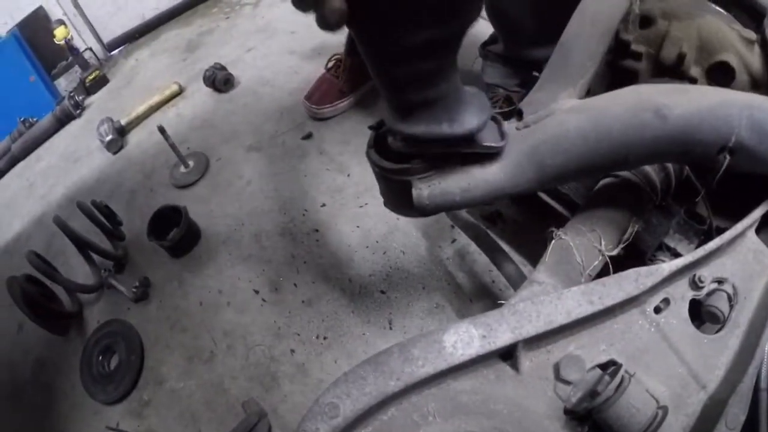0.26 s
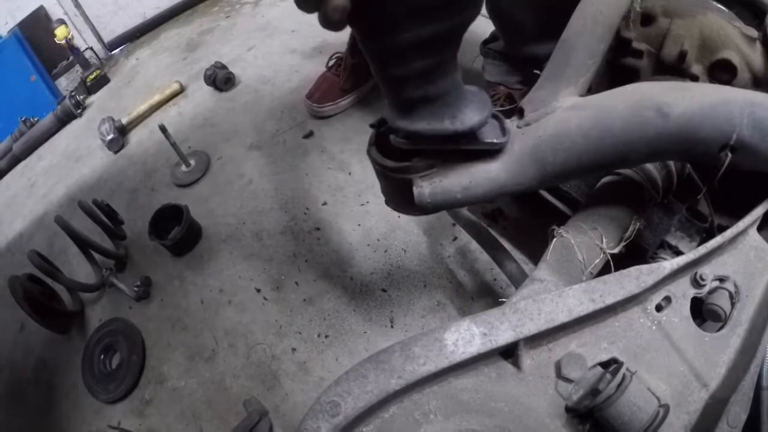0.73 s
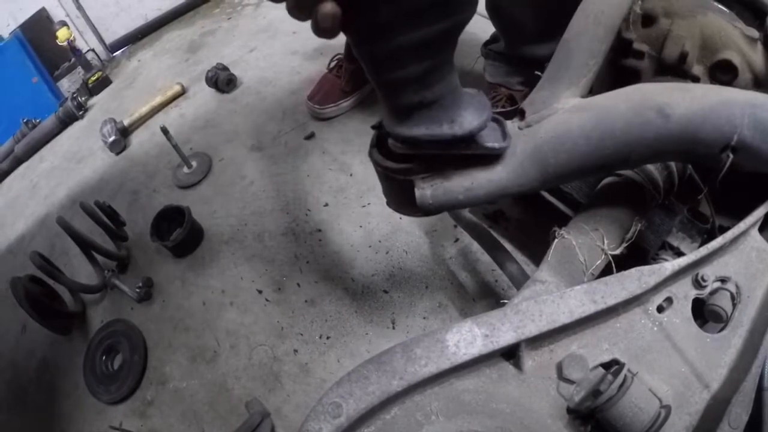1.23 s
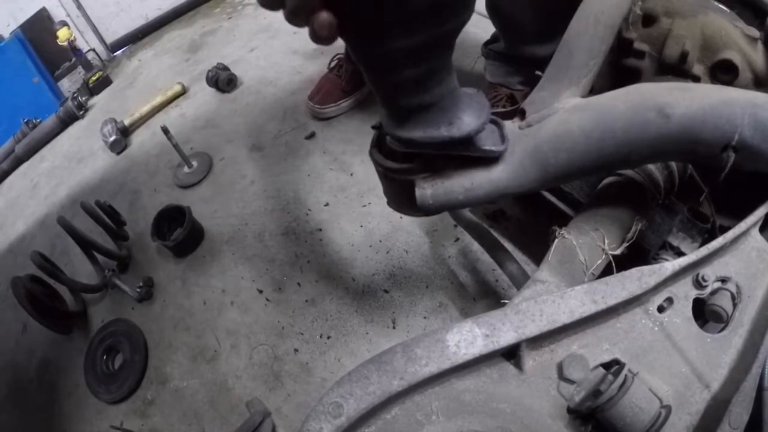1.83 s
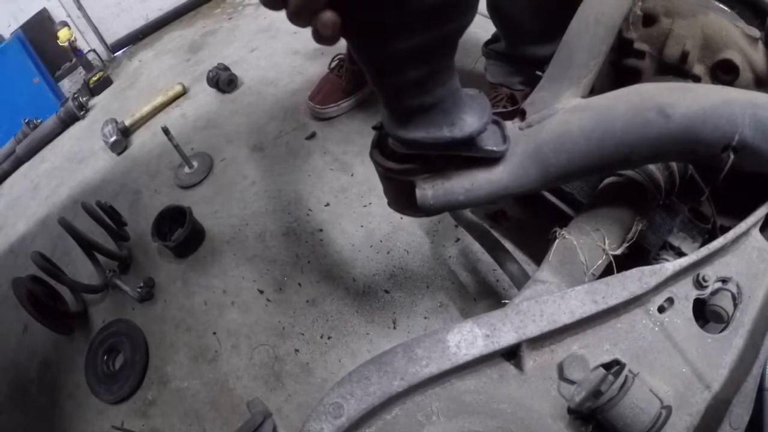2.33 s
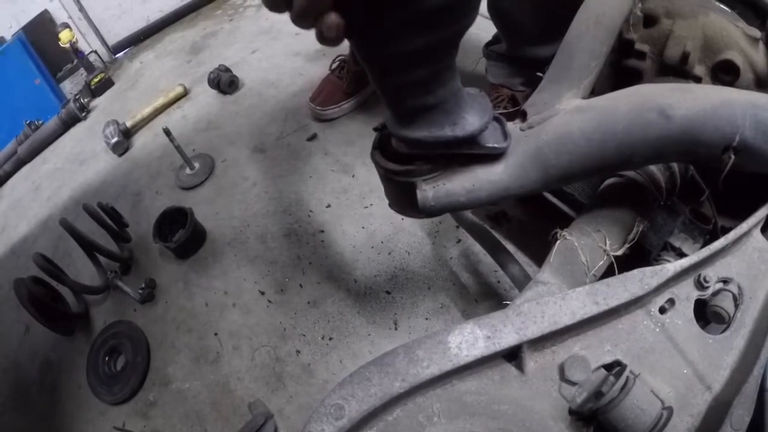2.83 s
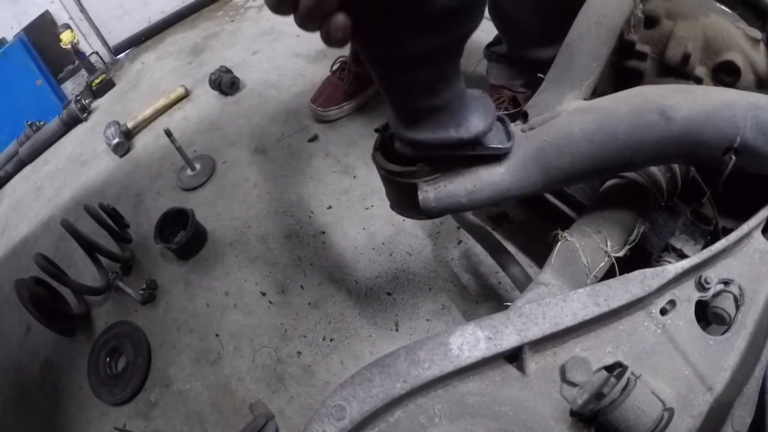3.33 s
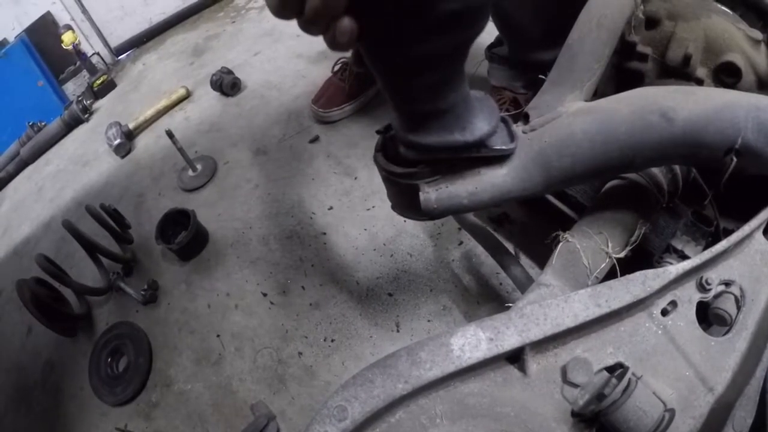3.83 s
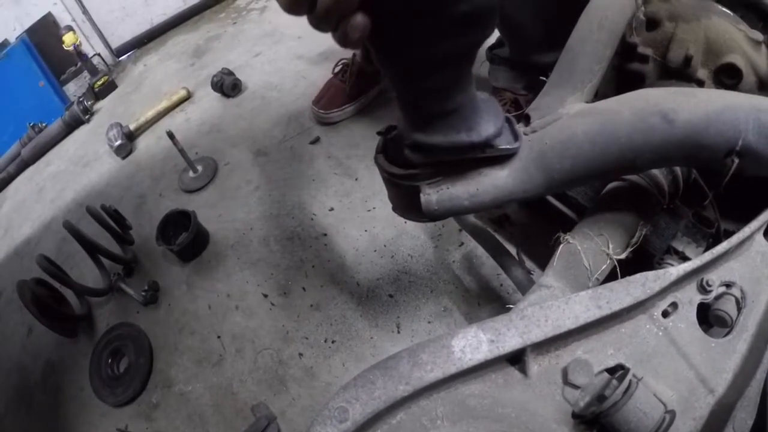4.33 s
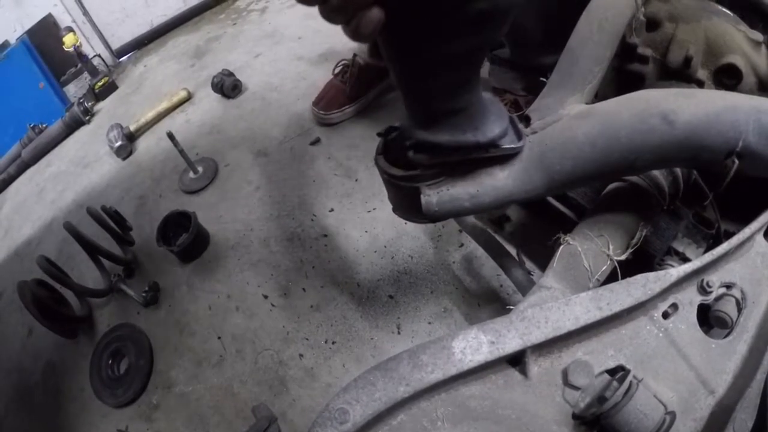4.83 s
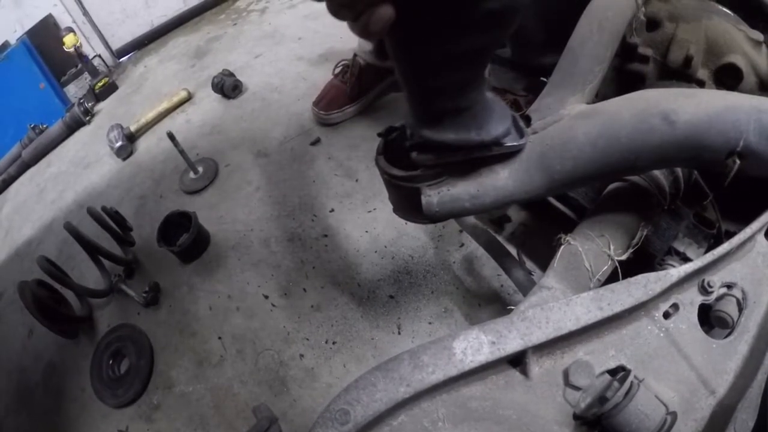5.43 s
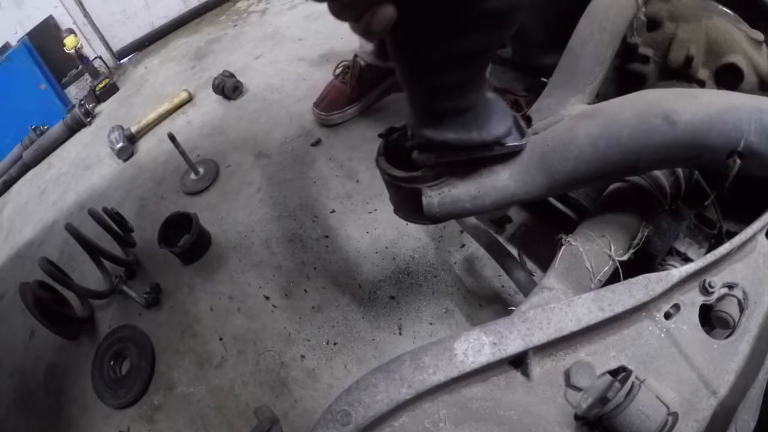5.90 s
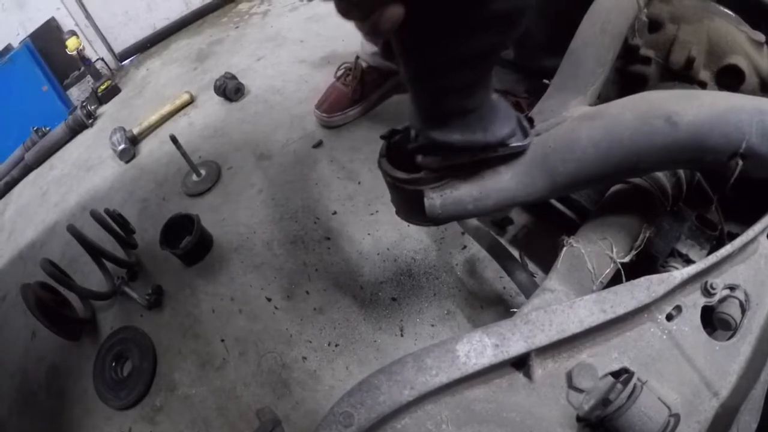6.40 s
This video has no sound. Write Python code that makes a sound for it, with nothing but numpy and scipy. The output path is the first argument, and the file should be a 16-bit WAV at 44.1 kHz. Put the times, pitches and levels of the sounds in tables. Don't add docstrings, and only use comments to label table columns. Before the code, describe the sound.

A reciprocating saw stutters into a steel sleeve, speeds up to a harsh, rattling cut, squeals late and chatters in a concrete garage.

```python
import sys
import numpy as np
from scipy import signal
from scipy.io import wavfile

SR = 44100
rng = np.random.default_rng(int(sys.argv[2]) if len(sys.argv) > 2 else 0)


def to_linear_factor(level_db):
    exponent = np.asarray(level_db, float) / 20
    return 10 ** exponent


def master(y):
    cut = np.clip(np.atleast_2d(y).T, -1, 1)
    pcm = np.round(cut * 32767)
    wavfile.write(sys.argv[1], SR, pcm.astype(np.int16))


N = 293706
TIME = np.arange(N) / SR

# (time [s], speed [turns/s])
CRANK_SPEED = [(0.0, 14.98), (0.12, 25.05), (0.27, 10.67), (0.58, 13.59), (0.94, 12.7), (1.21, 26.53),
               (1.85, 24.61), (2.58, 24.55), (2.75, 38.3), (3.53, 38.86), (3.86, 42.82), (4.03, 37.43),
               (4.36, 40.72), (4.6, 33.96), (5.49, 38.07), (6.3, 34.7), (6.38, 31.03), (6.66, 32.79)]
# (time [s], speed gained [turns/s])
SLIPS = [
    (1.1, 0.76),
    (1.42, 1.38),
    (1.9, 1.82),
    (2.64, 5.15),
    (3.22, -2.25),
    (3.38, 3.22),
    (4.72, 2.82),
    (5.13, 2.25),
    (5.89, -0.73),
    (6.26, 1.98),
]
# (time [s], position [share of a turn])
BITE_POSITION = [(0, .44), (1.0, .46), (2.0, .42), (3.0, .44), (3.2, .36), (3.9, .33), (4.1, .43),
                 (5.0, .435), (6.0, .445), (6.4, .39), (6.66, .42)]
# (time [s], steady rasp [dB], bite [dB], return knock [dB], shoe on the frame [dB])
HAND_FEED = [(0, -29.5, -26.5, -13.5, 6), (.15, -25, -16, -22, 4.5), (.3, -32.5, -30, -28, 5),
             (.43, -44, -55, -37, 4), (.6, -33.5, -28, -28, 3), (.72, -30, -26.5, -22.5, 5),
             (1.0, -30, -16.5, -15.5, 0.5), (1.2, -23, -14, -20, 4), (1.6, -24.5, -13.5, -17.5, 2),
             (2.2, -23, -12.5, -8.5, 0.5), (2.6, -24, -13.5, -20, 1.5), (2.68, -19, -11.5, -12, -2),
             (3.5, -19.5, -12, -15, 1), (4.35, -20, -13, -9, 0), (4.6, -20.5, -9, -20, 2.5),
             (5.4, -22.5, -10, -28, 2.5), (6.25, -20.5, -12.5, -8, -2.5), (6.66, -24.5, -10.5, -13, 0.5)]
# (time [s], peak [dB], brightness [dB])
SNAGS = [(0.103, -13.5, -50), (0.144, -23, -45), (0.2771, -13, -15), (0.392, -16.5, -15),
         (0.5874, -20, -24), (0.681, -18.5, -18), (0.775, -27, -24), (0.813, -25, -25), (0.851, -31, -28),
         (0.9645, -18, -30), (2.378, -10, -36), (6.3932, -5, -14), (6.4594, -4.5, -7)]
# (time [s], tone pitch [Hz], tone [dB], screech [dB])
SQUEAL = [
    (5.45, 2440, -22, -70),
    (5.52, 2365, -29, -55),
    (5.62, 2320, -20, -32),
    (5.67, 2120, -25.5, -30.5),
    (5.85, 2023, -19, -30),
    (5.92, 2002, -20, -29),
    (6.0, 2014, -24.5, -31),
    (6.13, 2000, -19, -29),
    (6.18, 2070, -41, -63),
]
# (time [s], pitch [Hz], level [dB])
PLATE_RING = [
    (.26, 3930, -62),
    (.32, 3940, -58),
    (.55, 3980, -45),
    (.62, 3940, -70),
]
# (mesh pitch [Hz], mesh [dB], half mesh [dB])
GEAR_CASE = [(1100, -53, -71), (1360, -41, -62), (1860, -36, -48), (2406, -35.5, -43), (2526, -26, -39),
             (2970, -30, -52), (3510, -37.5, -31.5), (4060, -41.5, -28.5)]
# (speed [turns/s], order 1 [dB], order 2 [dB], order 4 [dB], rumble [dB])
FLOOR_SHAKE = [(11, -53, -46, -57, -56), (13.4, -64, -48, -57, -56), (24.9, -40.5, -49, -60, -42.5),
               (26.8, -39, -55, -62, -45.5), (33, -43.5, -41, -55, -40), (32.9, -38, -50.5, -55.5, -45),
               (36.8, -48, -45.5, -41.5, -41.5), (39, -42.5, -44, -124, -39.5)]
# (pitch [Hz], width [Hz], level [dB])
FRAME_MODES = [(1183, 176, -8), (1441, 220, -1), (1480, 1000, -29.5), (1884, 59, -1.5), (1977, 84, -1.5),
               (2180, 20, -19.5), (2486, 30, -1.5), (2624, 37, -5), (2897, 43, -0.5), (3050, 43, -3),
               (3255, 170, 1.5), (3581, 57, -0.5), (3823, 40, -1.5), (4445, 81, -10.5), (4940, 57, -13.5),
               (5353, 83, -11)]
# (pitch [Hz], width [Hz], level [dB])
SLEEVE_MODES = [(1850, 260, -4.5), (2612, 344, 2.5), (3132, 180, 3), (5390, 160, -11.5)]
# (pitch [Hz], width [Hz], level [dB])
CHIP_MODES = [(5600, 5100, 16), (8040, 540, 4), (9500, 1500, -57), (10400, 170, -14), (10980, 130, 2),
              (12800, 2200, -19), (15160, 620, 9)]
# (pitch [Hz], width [Hz], level [dB])
BLADE_MODES = [(4310, 180, 2), (5640, 70, -5), (6000, 110, -3), (6280, 54, -4.5), (7870, 670, -3.5),
               (10100, 500, -13)]
# (pitch [Hz], width [Hz], level [dB])
CHATTER_MODES = [(2780, 180, -7), (3130, 230, -2), (4700, 480, -10)]
# (pitch [Hz], width [Hz], level [dB])
PANEL_MODES = [(171.6, 10.6, -1.5), (312.6, 25.5, 5.5), (398, 43, 8), (532, 67, 0.5)]


def rms_one(x):
    return x / np.sqrt(np.mean(x ** 2) + 1e-20)


def read(rows, at):
    first, *columns = np.transpose(rows)
    return [np.interp(at, first, c) for c in columns]


def in_time(rows):
    return read(rows, TIME)


def resonate(x, hz, width):
    r = np.exp(-np.pi * width / SR)
    feedback = [1, -2 * r * np.cos(2 * np.pi * hz / SR), r * r]
    return signal.lfilter([(1 - r * r) / 2, 0, (r * r - 1) / 2], feedback, x)


def drift(rate):
    r = np.exp(-32 * np.pi * rate / SR)
    noise = rng.standard_normal(N // 16 + 3002)
    slow = rms_one(signal.lfilter([1], [1, -2 * r, r * r], noise)[3000:])
    return np.interp(np.arange(N) / 16, np.arange(len(slow)), slow)


def grit(spread_db):
    size_db = spread_db * np.minimum(rng.exponential(1, N), 5)
    return rms_one(rng.standard_normal(N) * to_linear_factor(size_db))


def contact(turns, late_ms, spread_db, rise_ms, fall_ms):
    marks = np.flatnonzero(np.diff(np.floor(turns)) > 0)
    luck = rng.standard_normal((500, 2))[:len(marks)]
    at = marks + (luck[:, 0] * late_ms * SR / 1000).astype(int)
    clicks = np.zeros(N)
    clicks[np.clip(at, 0, N - 1)] = to_linear_factor(spread_db * luck[:, 1])
    ms = np.arange(2000) * 1000 / SR
    shape = (1 - np.exp(-ms / rise_ms)) * np.exp(-ms / fall_ms)
    return clicks, signal.fftconvolve(clicks, shape / shape.max())[:N]


def body(modes, force, blows, turns, spread_db, patchy_db, grain_db=3.5):
    out = np.zeros(N)
    turn = (turns + .7).astype(int)
    teeth = grit(grain_db)
    for k, (hz, width, level_db) in enumerate(modes):
        width = max(width, hz / 45)
        share = to_linear_factor(spread_db * rng.standard_normal(400))[turn] * to_linear_factor(patchy_db * drift(2.63))
        drive = share * (force * np.roll(teeth, 4001 * k) + blows)
        even = np.sqrt(SR / np.pi / width)
        out += (-1) ** k * to_linear_factor(level_db) * even * resonate(drive, hz, width)
    return out / np.sqrt(np.sum(to_linear_factor(np.array(modes)[:, 2]) ** 2))


def crank():
    slip_s, first_turn = .07, .5
    slips = sum(gain * np.exp(-.5 * ((TIME - s) / slip_s) ** 2) for s, gain in SLIPS)
    speed = in_time(CRANK_SPEED)[0] + slips
    return speed, first_turn + np.cumsum(speed) / SR


def garage(x, t60):
    s = np.arange(int(.5 * SR)) / SR
    tail = rng.standard_normal(len(s)) * to_linear_factor(-60 * s / t60) * (s > .004)
    return signal.fftconvolve(x, tail / np.sqrt(np.sum(tail ** 2)))[:N]


def buzz(turns):
    out = np.zeros(N)
    for k, lead in enumerate(rng.random(18), start=3):
        level_db = -0.5 * np.log2(k / 8) + 4.2 * drift(3.4)
        out += to_linear_factor(level_db) * np.cos(2 * np.pi * (k * turns + lead))
    return out


def shake(turns, speed):
    *orders_db, rumble_db = read(FLOOR_SHAKE, speed)
    low = np.zeros(N)
    for db, k, lead in zip(orders_db, (1, 2, 4), (.5, .1, 2)):
        low += to_linear_factor(db + 3 + 3.0 / k * drift(4)) * np.cos(2 * np.pi * k * turns + lead)
    hits, jolt = contact(turns - .45, late_ms=.15, spread_db=1.0, rise_ms=1.2, fall_ms=4.0)
    panels = body(PANEL_MODES, to_linear_factor(rumble_db - 9) * (.7 + jolt), to_linear_factor(rumble_db + 27) * hits, turns,
                  spread_db=.8, patchy_db=2.2, grain_db=.5)
    floor = to_linear_factor(-55.0) * rms_one(resonate(rng.standard_normal(N), 29, 45))
    return low + to_linear_factor(-1) * panels + to_linear_factor(rumble_db - 17) * buzz(turns) + floor


def gears(turns, speed):
    mesh_per_turn, follows_bite = 97.8, 0.49
    case_hz, case_width_hz, rattle_width_hz = 2473, 103, 32
    rasp_db, bite_db, _, _ = in_time(HAND_FEED)
    hz = mesh_per_turn * speed
    mesh_db, half_db = read(GEAR_CASE, hz) + follows_bite * (bite_db + 14)
    angle = 2 * np.pi * turns
    bend = 1 + 0.011 * np.sin(angle + 0.69) + 0.0038 * drift(44.3)
    phase = 2 * np.pi * np.cumsum(hz * bend) / SR
    swell = to_linear_factor(2.5 * np.cos(angle - 3.3) + 5 * np.cos(2 * angle - .4) + 1.2 * drift(45))
    mesh = swell * to_linear_factor(mesh_db + 5.0) * np.sin(phase)
    half = to_linear_factor(half_db + 3.0 * np.cos(2 * angle - .6) + 2.0 * drift(40)) * np.sin(phase / 2)
    loose = rms_one(resonate(swell * grit(0.67), case_hz, rattle_width_hz))
    rattle = to_linear_factor(-36 + 0.33 * (rasp_db + 21.5)) * loose
    return mesh + resonate(mesh, case_hz, case_width_hz) + half + rattle


def thud(turns):
    _, bite_db, knock_db, shoe_db = in_time(HAND_FEED)
    pull_db = -26.5 + 0.76 * (bite_db + 12.5) + shoe_db
    back_db = -28 + 0.81 * (knock_db + 14) + shoe_db
    hits, pull = contact(turns - .43, late_ms=.25, spread_db=1.3, rise_ms=1.2, fall_ms=3.0)
    taps, back = contact(turns + .07, late_ms=.4, spread_db=1.8, rise_ms=1.2, fall_ms=3.0)
    force = to_linear_factor(pull_db) * (pull + 0.18) + to_linear_factor(back_db) * (back + 0.13)
    blows = to_linear_factor(24.0) * (to_linear_factor(pull_db) * hits + to_linear_factor(back_db) * taps)
    hollow = [(715, 110, -13), (930, 70, -4), (1000, 70, 0)]   # (pitch [Hz], width [Hz], level [dB])
    return body(hollow, to_linear_factor(-5) * force, blows, turns, spread_db=1.2, patchy_db=.6, grain_db=.6)


def chatter(turns):
    start_s, rise_s, level_db = 6.36, 0.018, -23
    gate = contact(2 * turns + .1, late_ms=0.49, spread_db=2.0, rise_ms=1.5, fall_ms=4.0)[1] + .2
    bound = np.clip((TIME - start_s) / rise_s, 0, 1)
    return bound * body(CHATTER_MODES, to_linear_factor(level_db) * gate, 0, turns,
                        spread_db=1.0, patchy_db=3.5, grain_db=4.5)


def squeal(turns, bite_at):
    hz, tone_db, screech_db = in_time(SQUEAL)
    gate = contact(turns - bite_at, late_ms=.5, spread_db=1.2, rise_ms=4.0, fall_ms=5.0)[1] + .15
    tone = np.sin(2 * np.pi * np.cumsum(hz * (1 + .018 * drift(201))) / SR)
    tone = tone * to_linear_factor(tone_db + 6 + 2.0 * drift(180))
    tone = tone * (1 + .5 * drift(530))
    screech = body(BLADE_MODES, to_linear_factor(screech_db + 5) * gate, 0, turns,
                   spread_db=1.5, patchy_db=.8, grain_db=1.2)
    squealing = (TIME > SQUEAL[0][0]) & (TIME < SQUEAL[-1][0])
    ring_hz, ring_db = in_time(PLATE_RING)
    plate = to_linear_factor(ring_db) * np.sin(2 * np.pi * np.cumsum(ring_hz) / SR)
    return squealing * (gate * tone + screech) + plate


def snag_bursts(dying):
    s, peak_db, bright_db = np.array(SNAGS).T
    at = (s * SR).astype(int)
    snags, bright = np.zeros(N), np.zeros(N)
    snags[at] = to_linear_factor(peak_db - 4.5)
    bright[at] = to_linear_factor(peak_db + bright_db - 8)
    return signal.fftconvolve(snags, dying)[:N], signal.fftconvolve(bright, dying)[:N]


def blade(turns, bite_at):
    rasp_db, bite_db, knock_db, _ = in_time(HAND_FEED)
    hiss_db = -46.5 + 1.36 * (rasp_db + 22)
    hits, bite = contact(turns - bite_at, late_ms=.25, spread_db=.9, rise_ms=.3, fall_ms=1.6)
    drag = contact(turns - bite_at - .12, late_ms=1, spread_db=2, rise_ms=2, fall_ms=3.5)[1]
    taps, knock = contact(turns + .05, late_ms=.5, spread_db=1.5, rise_ms=.4, fall_ms=2.2)

    bite_over = np.sqrt(np.maximum(to_linear_factor(bite_db) ** 2 - to_linear_factor(rasp_db) ** 2, 1e-9))
    knock_over = np.sqrt(np.maximum(to_linear_factor(knock_db) ** 2 - to_linear_factor(rasp_db) ** 2, 1e-9))
    bursts = bite_over * bite + to_linear_factor(-10.5) * knock_over * knock
    rasp = to_linear_factor(rasp_db - 2.5 + 1.2 * drift(40)) + to_linear_factor(-14) * bite_over * drag
    blows = bite_over * hits + to_linear_factor(-7) * knock_over * taps
    blows = blows + to_linear_factor(-2.5) * np.roll(blows, 52) + to_linear_factor(-8) * np.roll(blows, 130)
    snags, bright = snag_bursts(np.exp(-np.arange(3000) / (0.0028 * SR)))

    crack = body(SLEEVE_MODES, to_linear_factor(-7) * bursts, to_linear_factor(19) * blows, turns,
                 spread_db=.8, patchy_db=.5, grain_db=.5)
    frame = body(FRAME_MODES, rasp + to_linear_factor(-12) * bursts + snags, to_linear_factor(3) * blows, turns,
                 spread_db=1.5, patchy_db=1.0, grain_db=1.5)
    crack = signal.sosfilt(signal.butter(2, 5200, fs=SR, output="sos"), crack)
    radiated = signal.butter(2, [900, 6360], "band", fs=SR, output="sos")
    steel = signal.sosfilt(radiated, crack + frame)

    strokes = to_linear_factor(-10) * (bursts + to_linear_factor(5.0) * bite_over * drag) / to_linear_factor(rasp_db)
    spray = to_linear_factor(hiss_db + 2.0 + 0.96 * drift(16.0)) * (1 + strokes) + bright
    return steel + body(CHIP_MODES, spray, 0, turns, spread_db=1.5, patchy_db=.8, grain_db=1.8)


def scene():
    speed, turns = crank()
    bite_at = in_time(BITE_POSITION)[0]
    saw = gears(turns, speed) + thud(turns) + chatter(turns)
    saw = saw + squeal(turns, bite_at) + blade(turns, bite_at)
    return (saw + to_linear_factor(-14.5) * garage(saw, t60=0.68) + shake(turns, speed))[None]


def low_pass(x):
    return signal.sosfilt(signal.butter(12, 15700, fs=SR, output="sos"), x)


def record(dry):
    rounded = 1.1 * np.tanh(dry / 1.1)
    mix = signal.sosfilt(signal.cheby2(14, 60, 15550, fs=SR, output="sos"), rounded)
    return low_pass(mix)


dry = scene()
out = record(dry)
master(out)
```